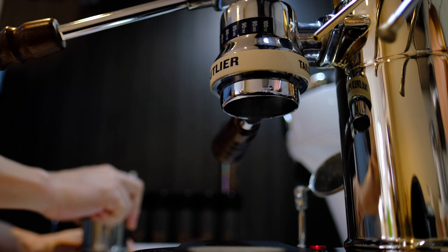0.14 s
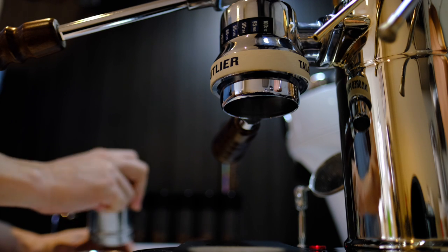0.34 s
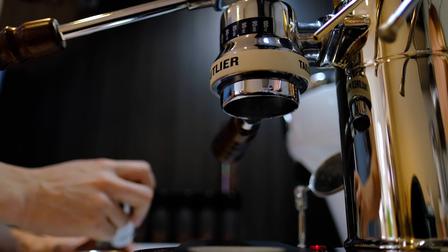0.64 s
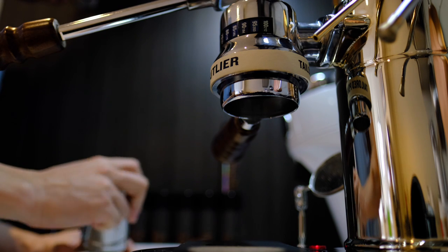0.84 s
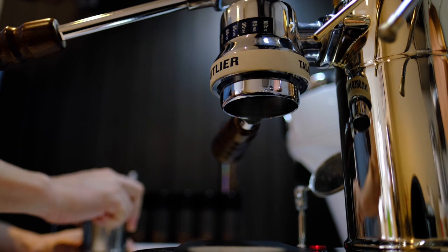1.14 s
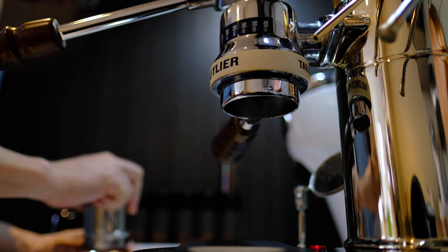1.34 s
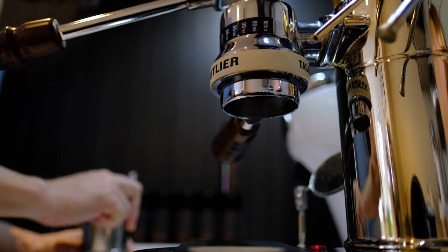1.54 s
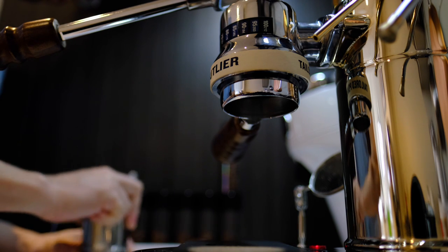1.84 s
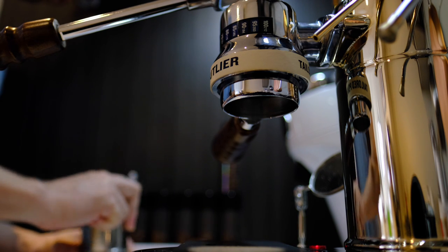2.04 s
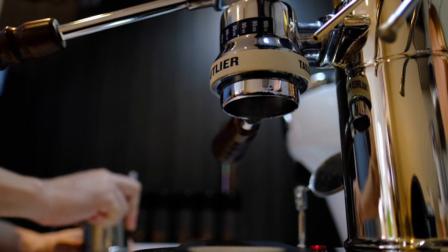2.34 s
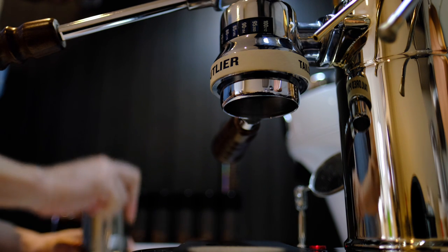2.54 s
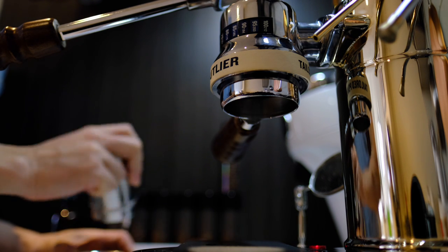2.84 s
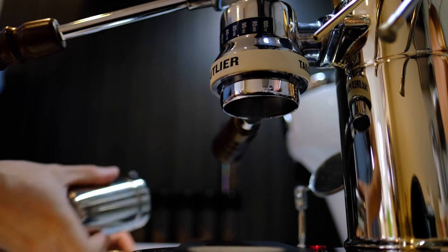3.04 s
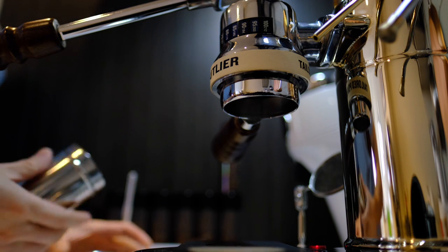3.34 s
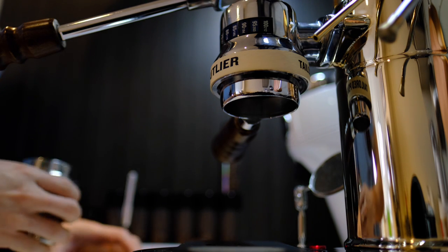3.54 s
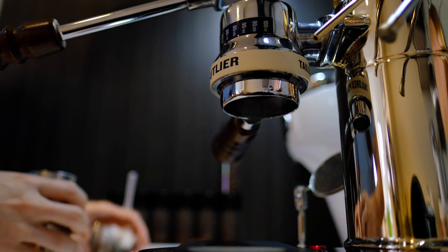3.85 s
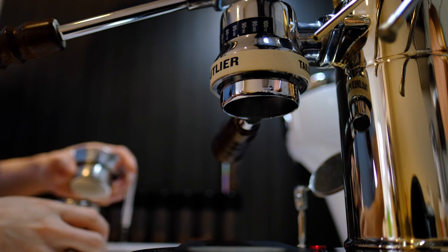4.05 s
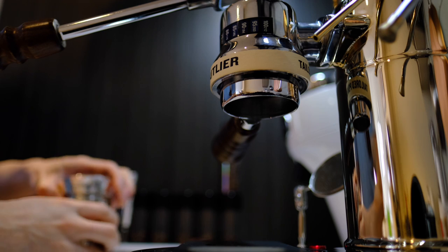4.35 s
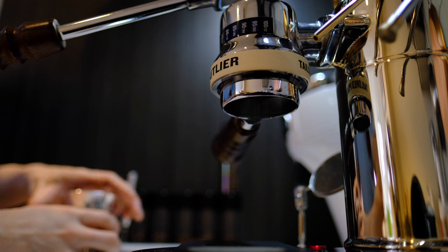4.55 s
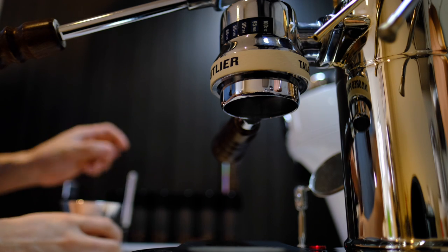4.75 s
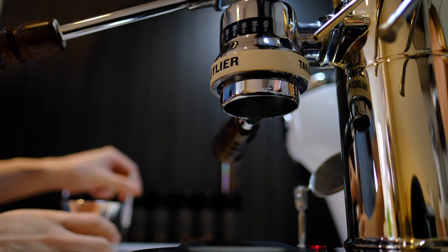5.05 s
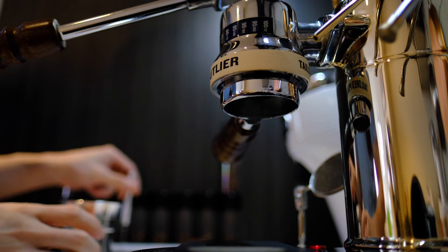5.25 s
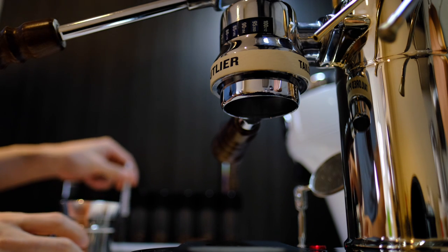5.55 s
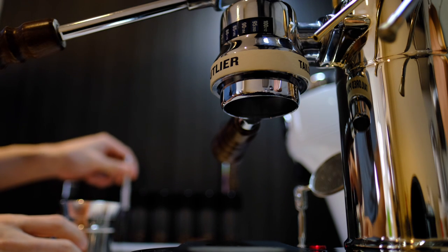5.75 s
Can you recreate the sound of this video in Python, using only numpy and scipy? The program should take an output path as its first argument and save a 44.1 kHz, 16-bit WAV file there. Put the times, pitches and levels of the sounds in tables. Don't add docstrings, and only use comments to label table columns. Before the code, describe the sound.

A hand-held steel dosing cup knocks twice at the start, then once more at its lip. Five very loud, bright taps follow on the counter at a quick even pace. After a quiet pause with tiny ticks, the cup clinks onto a metal basket and settles, then a small glass is put down. Low espresso machine hum, hard reflective room, close phone microphone overloading on the taps.

```python
import sys
import numpy as np
from scipy import signal
from scipy.fft import rfft, irfft
from scipy.io import wavfile
from scipy.ndimage import uniform_filter1d

SR = 44100
rng = np.random.default_rng(int(sys.argv[2]) if len(sys.argv) > 2 else 0)


def nominal_scale(level):
    x = np.asarray(level, float) / 20
    return 10 ** x


def log_audio(samples):
    frames = np.atleast_2d(samples).T
    limited = np.clip(frames, -1, 1)
    pcm = np.round(limited * 32767).astype(np.int16)
    wavfile.write(sys.argv[1], SR, pcm)


N = 260190

# start in seconds, level in dB, brightness in dB per octave, chatter in ms, bounce in ms.
BLOWS = [(0.0, -5.5, 3, 4.8, .525), (0.188, -1.5, -1, 10, 2.35), (1.023, -4.5, 2.5, 8.3, .02),
         (1.539, 13.5, 0.5, 12, 2.5), (1.821, 14.5, 4.5, 4.0, 1.51), (2.0743, 14.5, 5, 6.4, 2.1),
         (2.338, 13, 0, 7.4, 2.155), (2.597, 16.5, 14.5, 12, 2.245), (4.197, 0.5, -1, 8.1, .02),
         (4.4034, -2, 1.5, 23, .02), (4.7183, -4.5, 0.5, 3.9, .02), (4.735, -23.5, 11, 25, .02)]
# frequency in Hz, level in dB per Hz.
CRACK_SPECTRUM = [(35, -62), (120, -22), (400, -13.5), (760, -6), (1500, 6.5), (2900, 3.5), (3900, -9.5),
                  (4700, 1.5), (6200, -2), (9000, -0.5), (13100, -4), (15400, -5), (16500, -42.5)]

# frequency in Hz, width in Hz, level in dB.
BASE_ON_COUNTER = [(209, 56, -20), (694, 150, -5.35), (860, 100, -12.5), (1023, 30, -11), (1154, 70, -12.5),
                   (1490, 87, -10.5), (1684, 86, -6), (2050, 140, -4.5), (2180, 100, -6.5),
                   (2613, 43, -7.5), (3007, 98, 2), (3342, 46, -2.5), (3695, 40, -5), (3730, 240, -6)]
LIP_ON_COUNTER = [(191.6, 86, -14.5), (747, 71, -17.5), (1148, 73, -8), (2180, 87, -12.5), (3010, 100, -2),
                  (3997, 410, 0.5)]
CUP_ON_BASKET = [(850, 130, 1), (1830, 140, -11), (2300, 200, -6), (3400, 150, -6), (3770, 120, -1),
                 (7480, 90, 0)]
CUP_INTO_BASKET = [(930, 71, -20), (1650, 145, -6), (2730, 115, -6), (5390, 135, -4), (7480, 200, 3)]
GLASS_ON_TRAY = [(138, 170, -13.5), (1004, 53, -4.5), (1120, 120, 2), (1567, 86, 2.5), (1863, 190, -5),
                 (2450, 86, -8), (3640, 83, -4.5)]

# frequency in Hz, level in dB, T60 in seconds.
CUP_HELD = [(1730, -16, 0.15), (3210, -7, 0.27), (3634, 1, 0.21), (5100, -10, .25), (5800, -9.5, .3)]
CUP_LIP = [(1410, -6, 0.18), (2900, 1.5, .3), (4840, -5, .3), (5270, -7, .3), (7500, -8, 0.26),
           (9160, -13.5, 0.2)]
CUP_TAPPED = [(950, -12, 0.36), (2530, -5, .15), (3450, -4, .2), (3745, 4, .2), (4900, -8.5, .2),
              (8100, -3.5, .2)]
CUP_FREE = [(2767, -9, .3), (3779, -5, .55), (5390, -7, .45), (7380, -8, .3), (7596, -4, .15)]
CUP_SEATED = [(2767, -7, .35), (3779, -10, .5), (5390, -8, .45), (7390, -2, .3), (7596, 1, .1),
              (12900, -13, .5)]
GLASS = [(916.6, -17, 0.3), (2778, -15, 0.3), (7402, 2, 0.19), (12350, -9, .14), (13900, -18, 0.11)]

# start in seconds, level in dB, frequency in Hz, T60 in seconds, click in dB.
TICKS = [(3.256, -60, 2750, .15, -82), (3.384, -55.5, 7530, 0.068, -63), (3.383, -60.5, 3780, .12, -81),
         (3.552, -50, 2715, 0.055, -89), (3.555, -60, 13100, 0.11, -91), (3.556, -60, 7740, 0.094, -80.5),
         (3.602, -54, 15470, 0.15, -80.5), (3.668, -49.5, 2766, 0.052, -88.5),
         (3.67, -68.5, 8740, 0.055, -83), (4.332, -34, 2620, 0.03, -50), (4.866, -47.5, 7410, 0.087, -66),
         (4.866, -56, 2800, 0.1, -72.5), (5.13, -55.5, 5580, 0.088, -45.5),
         (5.134, -49.5, 2180, 0.21, -66.5), (5.136, -56, 2000, 0.1, -80.5), (5.5495, -54, 7500, 0.068, -51),
         (5.555, -55, 2180, 0.12, -88.5), (5.756, -72, 5970, 0.029, -59.5)]
# start in seconds, length in seconds, level in dB, centre in Hz, width in Hz.
RUSTLES = [(1.179, 0.1, -50.5, 1400, 550), (5.05, 0.28, -78, 8800, 5550), (4.29, 0.13, -40, 4700, 5700),
           (3.42, 0.11, -75, 15000, 3800), (3.593, 0.12, -56, 3200, 12000), (5.3, 0.036, -67, 6300, 1900),
           (5.44, 0.039, -66.5, 5600, 1800), (5.56, 0.12, -66.5, 7900, 6000)]
# time in seconds, frequency in Hz, level in dB.
SQUEAK_TRACK = [(4.851, 12700, -104), (4.899, 13200, -62.5), (4.942, 13800, -74), (4.98, 13600, -76.5),
                (5.02, 14200, -68), (5.062, 15100, -64.5), (5.1, 13500, -63.5), (5.141, 12600, -64),
                (5.18, 11500, -78)]

# frequency in Hz, T60 in seconds.
ROOM_T60 = [(100, 0.44), (700, 0.48), (2500, 0.6), (7000, 0.56), (15000, 0.15)]
# frequency in Hz, level in dB per Hz.
NOISE_SPECTRUM = [(12, -43.5), (20, -12.5), (117, -7), (174, -22), (218, -11.5), (265, -18.5), (416, -21.5),
                  (506, -20), (551, -20.5), (816, -22.5), (1690, -32.5), (2240, -38.5), (11100, -55.5),
                  (14300, -47), (16500, -73.5)]
# frequency in Hz, width in Hz, level in dB.
HUM_BANDS = [(59.04, 15, 7), (120.84, 9.6, 11.5), (146, 7.7, 7.5), (206, 16, 3), (554, 30, 9.5),
             (1680, 20, 12), (14000, 400, 6), (15400, 1200, 6)]

HELD_DB, LIP_DB, TAPPED_DB, FREE_DB, SEATED_DB = -25.5, -32.5, -31.5, -22, -16.5
LANDING_DB, ROCKING_DB = -36.5, -16.5
KNOCK_DB, WALL_KNOCK_DB, WALL_RING_DB, WALL_BLUR = -2, -2.5, -5.0, 3.6
RING_ROUGH, FLUTTER_HZ = .5, 50
BOUNCE_FLOOR, BOUNCE_ABOVE_HZ = 0.04, 400
KNOCK_LAG_SAMPLES, RING_LAG_SAMPLES = 4, 2
PORT_NULL_HZ, BASS_ALIKE = 3100, .9
ROOM_DB, EARLY_DB, EARLY_T60_S = -10.5, -13, .075
NOISE_DB = -44.5
OVERLOAD_DB, DIP_PER_DB = 1.86, 1.197
REACT_S, GRAB_S, GRAB_SHARE = .007, .004, .8
CREEP_S, RELEASE_S, RELEASE_BEND = .06, 0.088, 1.3
LOW_CUT_HZ = 120


def unit(x):
    return x / np.sqrt(np.mean(x ** 2))


def wander(shape, size, mode="reflect"):
    return uniform_filter1d(rng.standard_normal(shape), size, mode=mode)


def add(out, start_s, x):
    i = int(start_s * SR)
    out[:, i:i + x.shape[-1]] += x[..., :N - i]


def on_log(table, hz):
    table_hz, value = np.transpose(table)
    return np.interp(np.log(np.maximum(hz, 1)), np.log(table_hz), value)


def causal(gain):
    cepstrum = irfft(np.log(gain))
    half = len(cepstrum) // 2
    cepstrum[1:half] *= 2
    cepstrum[half + 1:] = 0
    return irfft(np.exp(rfft(cepstrum)))


def diffuse(size, gain):
    hz = np.fft.rfftfreq(size, 1 / SR)
    alike = BASS_ALIKE * np.sinc(np.minimum(hz / PORT_NULL_HZ, 1))
    noise = rfft(rng.standard_normal((2, size)))
    mid, side = noise * gain(hz) * np.sqrt([1 + alike, 1 - alike])
    return irfft(np.array([mid + side, mid - side]), size)


def modes(table, size):
    t = np.arange(size) / SR
    out = 0
    for hz, db, t60_s in table:
        out = out + nominal_scale(db) * np.exp(-np.log(1000) * t / t60_s) * np.sin(2 * np.pi * hz * t)
    return out


def blow(db, bright_db, ring_db, chatter_ms, knock, ring):
    size = 34000
    t = np.arange(size) / SR
    spread = crack(db, bright_db, chatter_ms)
    body = modes(damped(knock, db + KNOCK_DB), size)
    tone = nominal_scale(ring_db) * ringing(ring, t) * (1 - np.exp(-t * 2000 / chatter_ms))
    second_port = np.roll(body, KNOCK_LAG_SAMPLES) + np.roll(tone, RING_LAG_SAMPLES)
    ports = np.array([body + tone, second_port])
    ports[:, :spread.shape[1]] += spread
    walls = modes(damped(knock, db + WALL_KNOCK_DB, WALL_BLUR), size) + nominal_scale(WALL_RING_DB) * tone
    walls[:spread.shape[1]] += spread[0]
    return ports, walls[None]


def crack(db, bright_db, chatter_ms):
    hz = np.fft.rfftfreq(1024, 1 / SR)
    tilt_db = bright_db * np.log2(np.maximum(hz, 500) / 2000)
    response = causal(nominal_scale(on_log(CRACK_SPECTRUM, hz) + tilt_db))
    t = np.arange(6000) / SR
    push = (1 - np.exp(-t / 0.00025)) * np.exp(-t * 1000 / chatter_ms)
    spread = signal.fftconvolve(push * diffuse(6000, np.ones_like), response[None])
    return spread * nominal_scale(db) / np.max(np.abs(spread))


def damped(knock, db, blur=1):
    return [(hz, db + mode_db, np.log(1000) / (np.pi * width_hz * blur)) for hz, width_hz, mode_db in knock]


def bounced(knock, bounce_ms):
    out = []
    for hz, width_hz, db in knock:
        if hz > BOUNCE_ABOVE_HZ:
            db = db + 10 * np.log10(BOUNCE_FLOOR + np.cos(np.pi * hz * bounce_ms / 1000) ** 2)
        out.append((hz, width_hz, db))
    return out


def ringing(table, t):
    out = 0
    for hz, db, t60_s in table:
        a, b = wander((2, len(t)), int(SR / FLUTTER_HZ), mode="wrap")
        waver = 1 - RING_ROUGH + RING_ROUGH * (unit(a) + 1j * unit(b)) / np.sqrt(2)
        out = out + nominal_scale(db - 60 * t / t60_s) * np.imag(waver * np.exp(2j * np.pi * hz * t))
    return out


def ticks():
    out = np.zeros((2, N))
    for start_s, db, hz, t60_s, click_db in TICKS:
        click = rng.standard_normal((2, 600)) * np.exp(-np.arange(600) / 690.0)
        add(out, start_s, modes([(hz, db, t60_s)], 8000)[None])
        add(out, start_s, nominal_scale(click_db) * np.diff(click))
    return out


def rustles():
    out = np.zeros((2, N))
    for start_s, length_s, db, centre_hz, width_hz in RUSTLES:
        size = int(length_s * SR)
        grains = unit(diffuse(size, lambda f: np.exp(-((f - centre_hz) / width_hz) ** 2)))
        add(out, start_s, nominal_scale(db) * grains * np.hanning(size))
    return out


def squeak():
    time_s, hz, db = np.transpose(SQUEAK_TRACK)
    t = np.arange(N) / SR
    waver = 1 + .01 * unit(wander(N, 150))
    phase = 2 * np.pi * np.cumsum(np.interp(t, time_s, hz) * waver) / SR
    grip_db = 4 * unit(wander(N, 700))
    level_db = np.interp(t, time_s, db, left=-150, right=-150)
    return nominal_scale(level_db + grip_db) * np.sin(phase)


def room(dry):
    t = np.arange(SR) / SR
    tail = np.zeros((2, SR))
    for hz in 60 * 2 ** np.arange(0, 8.6, .5):
        band = diffuse(SR, lambda f: np.exp(-(np.log2((f + 1) / hz) * 2) ** 2))
        late = nominal_scale(ROOM_DB - 60 * t / on_log(ROOM_T60, hz)) / np.sqrt(0.12 * SR)
        early = nominal_scale(EARLY_DB - 60 * t / EARLY_T60_S) / np.sqrt(.005 * SR)
        tail += band * (late + early) * np.minimum(t / 0.0013, 1)
    return signal.fftconvolve(dry.mean(axis=0)[None], tail)[:, :N]


def hum():
    def colour(f):
        peaks_db = sum(db / (1 + ((f - hz) / (width_hz / 2)) ** 2) for hz, width_hz, db in HUM_BANDS)
        return nominal_scale(on_log(NOISE_SPECTRUM, f) + peaks_db)

    scale = nominal_scale(NOISE_DB) / np.sqrt(np.mean(diffuse(N, colour) ** 2))
    out = 0
    for lo_hz, hi_hz, swell_db in [(0, 90, 2.6), (87, 300, 1.5), (278, 1500, 0.59), (1500, 17000, 0.36)]:
        swell = unit(wander(N, 6000, mode="wrap"))
        band = diffuse(N, lambda f: colour(f) * (f >= lo_hz) * (f < hi_hz))
        out = out + nominal_scale(swell_db * swell) * band
    return scale * out


def scene():
    held = (BASE_ON_COUNTER, CUP_HELD, HELD_DB)
    lip = (LIP_ON_COUNTER, CUP_LIP, LIP_DB)
    tapped = (BASE_ON_COUNTER, CUP_TAPPED, TAPPED_DB)
    contacts = [held, held, lip] + [tapped] * 5
    contacts += [(CUP_ON_BASKET, CUP_FREE, FREE_DB), (CUP_INTO_BASKET, CUP_SEATED, SEATED_DB),
                 (GLASS_ON_TRAY, GLASS, LANDING_DB), (GLASS_ON_TRAY, GLASS, ROCKING_DB)]
    near = ticks() + rustles() + squeak()
    far = near.copy()
    for event, (knock, ring, ring_db) in zip(BLOWS, contacts):
        start_s, db, bright_db, chatter_ms, bounce_ms = event
        ports, walls = blow(db, bright_db, ring_db, chatter_ms, bounced(knock, bounce_ms), ring)
        add(near, start_s, ports)
        add(far, start_s, walls)
    return near + room(far) + hum()


def dip(since_s):
    u = since_s - REACT_S
    grab = GRAB_SHARE * np.clip(u / GRAB_S, 0, 1)
    creep = (1 - GRAB_SHARE) * np.clip(u / CREEP_S, 0, 1)
    return (grab + creep) * np.exp(-(np.maximum(u - CREEP_S, 0) / RELEASE_S) ** RELEASE_BEND)


def gain_dip_db():
    t = np.arange(N) / SR
    out = np.zeros(N)
    for start_s, db, _, chatter_ms, _ in BLOWS:
        excess_db = max(db + 10 * np.log10(chatter_ms) - OVERLOAD_DB, 0)
        out += DIP_PER_DB * excess_db * dip(t - start_s)
    return out


def roll_off(x):
    return signal.sosfilt(signal.butter(12, 16660, fs=SR, output="sos"), x)


def record(dry):
    clipped = np.clip(dry * nominal_scale(-gain_dip_db()), -1, 1)
    low_pass = signal.butter(2, LOW_CUT_HZ, fs=SR, output="sos")
    clipped -= signal.sosfiltfilt(low_pass, clipped * (np.abs(dry) > .12))
    return roll_off(clipped)


dry = scene()
out = record(dry)
log_audio(out)
```